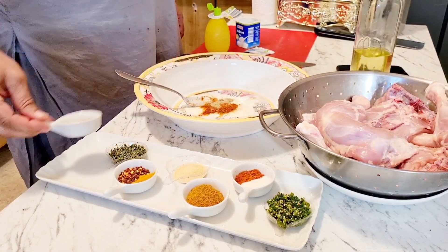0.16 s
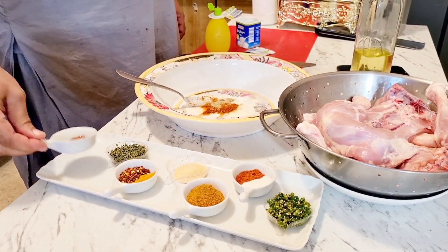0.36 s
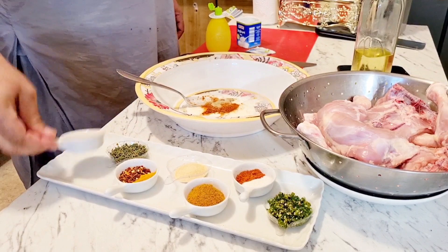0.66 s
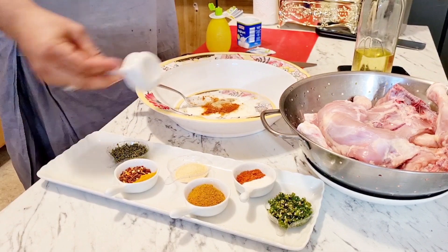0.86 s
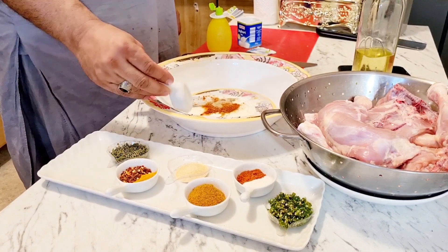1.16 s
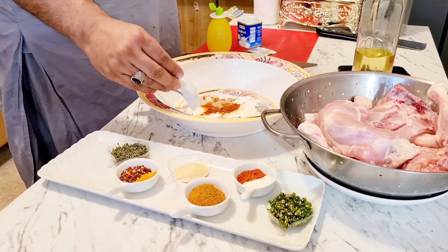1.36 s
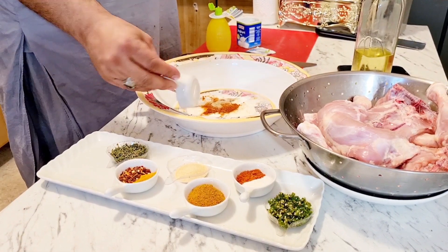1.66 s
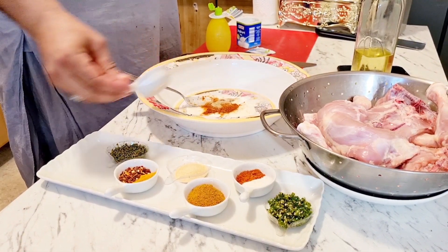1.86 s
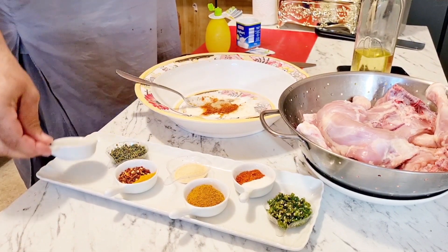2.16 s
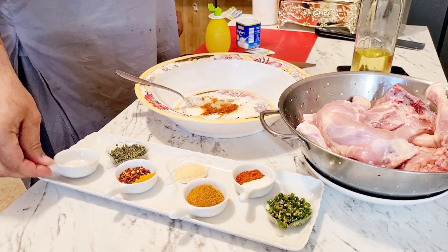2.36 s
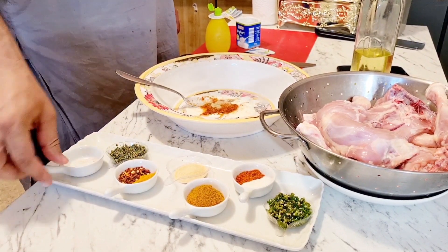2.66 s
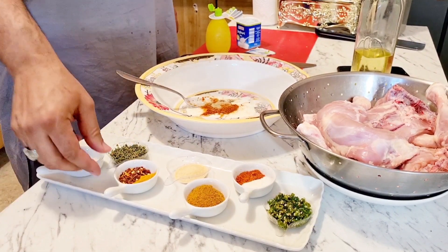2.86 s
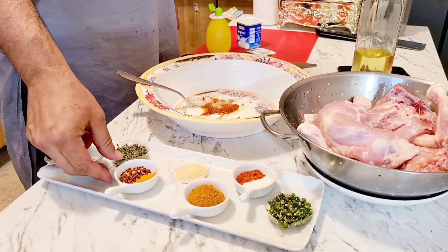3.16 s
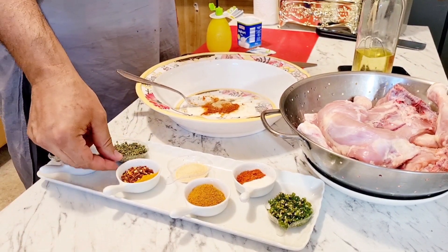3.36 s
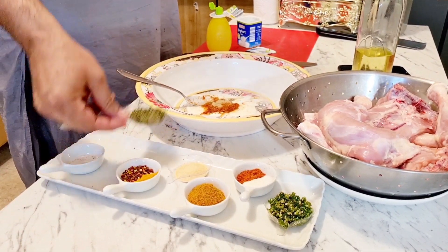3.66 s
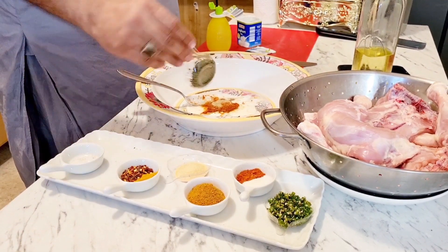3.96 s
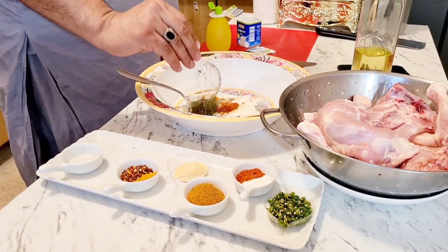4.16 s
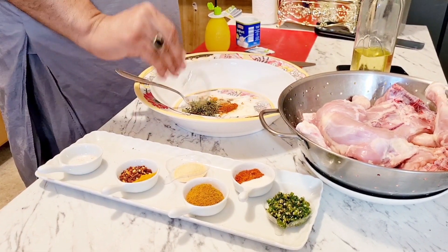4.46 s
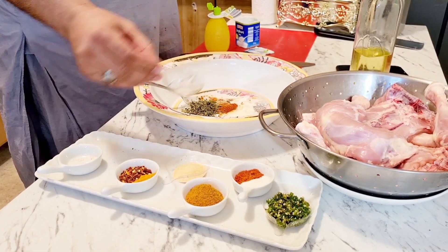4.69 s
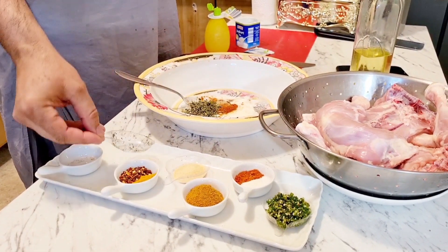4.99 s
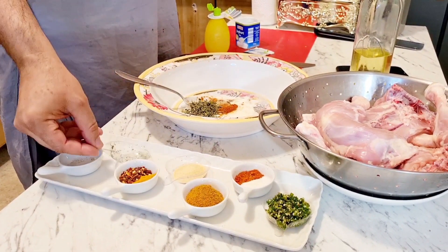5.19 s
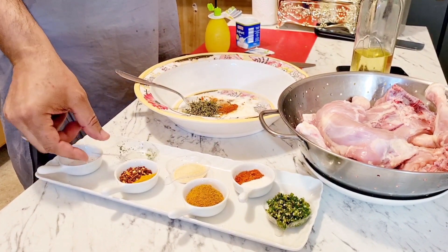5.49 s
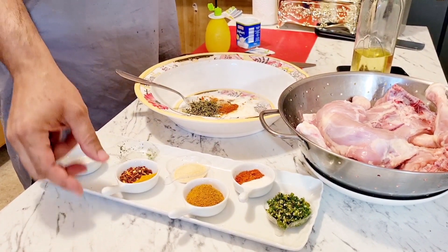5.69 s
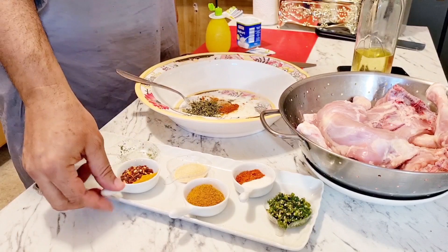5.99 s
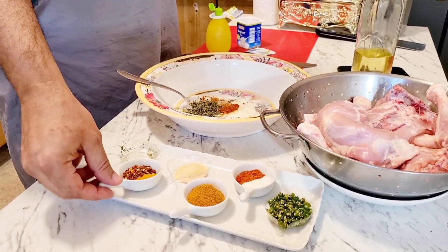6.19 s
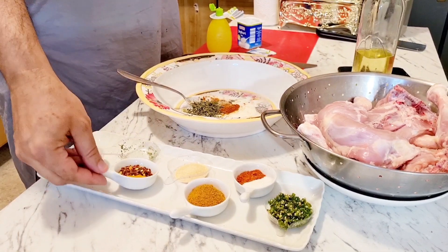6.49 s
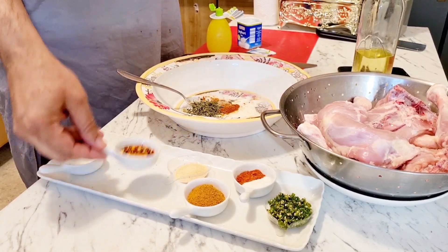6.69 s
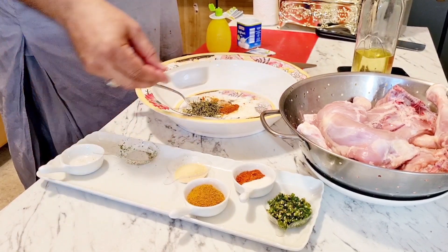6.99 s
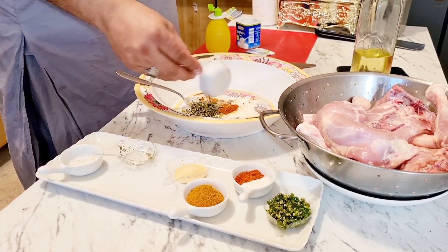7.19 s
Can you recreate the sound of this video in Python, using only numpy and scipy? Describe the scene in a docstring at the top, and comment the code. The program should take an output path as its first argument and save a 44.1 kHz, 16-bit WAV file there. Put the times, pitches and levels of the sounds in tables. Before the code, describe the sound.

In a quiet, hard-walled kitchen, a small ceramic bowl raps very loudly on a large bowl, then more softly. It strikes a neighbour with a loud ringing clink and clatters onto its tray. Dry herbs slide out in a short hiss, a glass bowl knocks back onto counter and tray, another bowl is nudged, and chilli flakes shower down. A clock ticks faintly. Close stereo microphones distort on the hardest blow.

```python
"""Small ceramic and glass bowls knock on a large bowl, on each other and on their tray in a hard-walled kitchen.
Each blow layers a double clack of shaped noise over decaying sine modes; the hardest overload the microphones.
Dry herbs and chilli flakes, tipped out by a cook, hiss as showers of tiny impacts, and a sleeve brushes as soft noise.
A clock ticks faintly once a second in short noise clacks, over coloured-noise air and a low hum."""
import sys
import numpy as np
from scipy import signal
from scipy.fft import rfft, irfft
from scipy.io import wavfile
from scipy.ndimage import uniform_filter1d

SR = 44100
rng = np.random.default_rng(int(sys.argv[2]) if len(sys.argv) > 2 else 0)


def wav_record(signal):
    """Record a signal, one row per channel, as 16-bit PCM in the file named by sys.argv[1]."""
    frames = np.transpose(np.atleast_2d(signal))
    bounded = np.clip(frames, -1, 1)
    # unit amplitude maps onto the largest positive 16-bit level
    quanta = np.round(bounded * 32767).astype(np.int16)
    wavfile.write(sys.argv[1], SR, quanta)


N = 323694  # length [samples]


def amp(db):
    """Decibels to gain."""
    return 10 ** (np.asarray(db) / 20)


def evened(x):
    """Scales to an rms of one."""
    return x / np.sqrt(np.mean(x ** 2) + 1e-20)


def read(points, hz):
    """Reads a spectrum on a log-frequency axis."""
    f, value = np.transpose(points)
    return np.interp(np.log(hz + 1), np.log(f), value)


def add(mix, s, sound):
    """Mixes a sound in at time s, cut off at the end of the mix."""
    part = mix[..., max(round(s * SR), 0):][..., :sound.shape[-1]]
    part += sound[..., :part.shape[-1]]


def coloured(x, spectrum):
    """Gives a full-length signal a spectrum, at an rms of one."""
    gain = amp(read(spectrum, np.fft.rfftfreq(N, 1 / SR)))
    return evened(irfft(rfft(x) * gain, N))


def swells(rows):
    """Gain that rises and falls smoothly about the middle of each row."""
    t = np.arange(N) / SR
    return sum(amp(db) * np.exp(-(2 * (t - s) / length) ** 2) for s, length, db in rows)


def burst(shape, count=4):
    """Noise of energy one under an envelope, with an even spectrum."""
    x = rng.standard_normal(len(shape)) * shape
    for _ in range(count):
        # flatten the spectrum, then restore the envelope
        x = irfft(np.exp(1j * np.angle(rfft(x))), len(shape))
        x *= shape / np.sqrt(abs(uniform_filter1d(x ** 2, size=128)) + 1e-18)
    return x / np.linalg.norm(x)


def contact(hz, bright_hz):
    """A softer contact drives the high modes less: gain falls steeply above bright_hz."""
    return 1 / np.sqrt(1 + (hz / bright_hz) ** 6)


def clack(spectrum, t60, bright_hz, modes=(), lift=1.6, width=0.022, size=8192):
    """Dense, quickly damped modes, made of decaying noise; they crowd round the main modes."""
    shape = amp(-60 * np.arange(size) / SR / t60) + 1e-7
    hz = abs(np.fft.fftfreq(size, 1 / SR))
    crowd = 1 + sum(lift / (1 + ((hz / mode[0] - 1) / width) ** 2) for mode in modes)
    gain = evened(amp(read(spectrum, hz)) * contact(hz, bright_hz) * crowd)
    # minimum phase keeps the attack sharp
    colour = np.exp(np.conj(signal.hilbert(np.log(gain + 1e-5))))
    noise = np.fft.ifft(np.fft.fft(burst(shape)) * colour).real
    fade = np.cos(np.linspace(0, np.pi / 2, size)) ** 2
    return noise * np.linalg.norm(shape) * fade


def ring(modes, bright_hz, free, echo, twin=0.26, split=0.0029, size=16000):
    """Decaying modes of random sign; an uneven wall gives each a weaker twin that beats with it."""
    hz, db, t60 = np.transpose(modes)[:, :, None]
    t60 = t60 * free
    t = np.arange(size) / SR
    sign, side = rng.choice([-1, 1], (2, *hz.shape))
    waves = np.sin(2 * np.pi * hz * t)
    waves += twin * np.sin(2 * np.pi * hz * (1 + side * split) * t)
    # mode levels hold at the microphones: divide by the room's gain across each mode's width
    power = (abs(rfft(echo)) ** 2).mean(0)
    bins = np.fft.rfftfreq(echo.shape[1], 1 / SR)
    weight = 1 / (1 + ((bins - hz) * 2 * np.pi * t60 / np.log(1000)) ** 2)
    room_gain = np.sqrt(weight @ power / weight.sum(1))[:, None]
    decay = amp(db - 60 * t / t60)
    return (sign * contact(hz, bright_hz) * decay * waves / room_gain).sum(0)


# colour of the echo at each microphone: (frequency [Hz], relative level [dB])
ECHO_COLOUR_LEFT = [(60, -3.5), (200, 1.5), (500, -3), (1200, -2.5), (2200, -7), (4000, -12.5),
                    (6500, -6.5), (15000, -2.5)]
ECHO_COLOUR_RIGHT = [(60, -8.5), (200, 0.5), (500, -2.5), (1200, 0.5), (2200, 1), (4000, -1), (6500, 6),
                     (15000, 9.5)]
RIGHT_LAG = 5  # samples by which the right microphone hears the direct sound later


def kitchen(wet_db, t60=0.34, build_s=.045, early=.38, air_hz=13000, left_db=-3, right_db=0,
            mono_hz=330, near=.5, near_s=0.0088, size=28000):
    """Direct path, quick counter reflections and an echo building between hard walls; air soaks up treble first."""
    t = np.arange(size) / SR
    build = 1 - (1 - early) * np.exp(-(t / build_s) ** 2)
    reflections = near * np.exp(-t / near_s)
    shape = amp(-60 * t / t60) * (build + reflections)
    hz, when, z = signal.stft([burst(shape), burst(shape)], SR, nperseg=256)
    same = 1 / (1 + (hz[:, None] / mono_hz) ** 4)  # long waves reach both microphones alike
    z[1] = np.sqrt(same) * z[0] + np.sqrt(1 - same) * z[1]
    colour_db = np.array([read(ECHO_COLOUR_LEFT, hz), read(ECHO_COLOUR_RIGHT, hz)])[:, :, None]
    air_loss_db = 60 * when * (hz[:, None] / air_hz) ** 2
    echo = signal.istft(z * amp(wet_db + colour_db - air_loss_db), SR, nperseg=256)[1]
    echo[0, 0] += amp(left_db)
    echo[1, RIGHT_LAG] += amp(right_db)
    return echo


def heard(x, echo):
    """Carries a sound through the room to both microphones."""
    return signal.fftconvolve(x[None], echo, axes=1)[:, :N]


# air at each microphone, rumble to hiss: (frequency [Hz], relative density [dB per Hz])
AIR_LEFT_SPECTRUM = [(20, -6.5), (45, -1), (100, -16.5), (200, -22.5), (270, -18.5), (500, -23.5),
                     (1000, -30.5), (1180, -14.5), (1500, -34.5), (4700, -31), (6100, -30.5), (6900, -11),
                     (7900, -32.5), (15500, -35.5)]
AIR_RIGHT_SPECTRUM = [(20, 5), (45, 7), (110, -9), (190, -11.5), (270, -18), (650, -25.5), (2500, -29),
                      (2900, -19), (4800, -21), (6900, -14), (8000, -40), (11500, -31), (15500, -32)]
# swells of the faint low hum: (middle [s], length [s], level [dB])
HUM_RISES = [(.1, 0.37, -67.5), (.8, 0.35, -71.5), (1.88, 0.33, -68), (2.8, 0.46, -69.5),
             (5.1, 0.22, -62.5)]


def room_tone(left_db=-67.0, right_db=-62.0, hum_rest_db=-85):
    """Rumble and thin hiss as coloured noise, with a low hum that swells and fades."""
    a, b, c = rng.standard_normal((3, N))
    left = amp(left_db) * coloured(a, AIR_LEFT_SPECTRUM)
    right = amp(right_db) * coloured(.5 * a + b, AIR_RIGHT_SPECTRUM)
    hum_band = ((150, -30), (250, -2), (350, 0), (480, -25), (1000, -60))
    hum = np.maximum(amp(hum_rest_db), swells(HUM_RISES)) * coloured(c, hum_band)
    return np.array([left, right]) + hum


# sleeve brushes as the arm moves: (middle [s], length [s], level before the room [dB])
BRUSHES = [(.12, 0.27, -65.5), (.69, 0.23, -57.5), (5.76, 0.44, -62)]
# hiss of the cloth: (frequency [Hz], relative density [dB per Hz])
CLOTH_HISS = [(500, -12), (2000, -13), (4200, -1.5), (5500, -0.5), (7000, -2.5), (8000, -34), (15500, -14)]


def sleeve(slips_per_s=1500):
    """Cloth fibres slip in a soft hiss that follows the arm."""
    slips = rng.standard_normal(N) * (rng.random(N) < slips_per_s / SR)
    brushing = swells(BRUSHES) * coloured(slips, CLOTH_HISS)
    return heard(brushing, kitchen(wet_db=-2)) * amp([[-10], [-3]])


# tone of the clock case: (frequency [Hz], relative density [dB per Hz])
CASE_TONE = [(200, -31.5), (650, -14.5), (950, -29.5), (1300, -13), (2400, -9), (2850, 5), (3600, -5),
             (4700, -14.5), (5600, -3.5), (6700, -9.5), (8100, -35.5), (10500, -30.5), (15600, -33)]
FIRST_TICK_S, TICK_PERIOD_S = .887, 1
TOCK_LATE_S, TOCK_DB = 0.017, 4  # every other catch comes late, and that tick is louder
TICK_GROWTH_DB_PER_S = 0.94  # the ticks grow slightly louder
# parts of one tick: (base level [dB], t60 [s])
CATCH, STEP, REBOUND = (-49, .16), (-42, 0.02), (-49.5, 0.04)
STEP_S, REBOUND_S = .036, .056  # after the start of the tick


def clock(direct_db=-6):
    """A small escapement across the room: a catch, then the hand's step and rebound, heard mostly as echo."""
    out = np.zeros(N)
    for k, s in enumerate(np.arange(FIRST_TICK_S, N / SR, TICK_PERIOD_S)):
        tock = k % 2
        lift_db = tock * TOCK_DB + TICK_GROWTH_DB_PER_S * s
        for delay, (db, t60) in ((tock * TOCK_LATE_S, CATCH), (STEP_S, STEP), (REBOUND_S, REBOUND)):
            add(out, s + delay, amp(db + lift_db) * clack(CASE_TONE, t60, bright_hz=13910))
    echo = kitchen(wet_db=-0.5, t60=.24, build_s=.02, early=0.29, near=0,
                   left_db=direct_db, right_db=direct_db)
    return heard(out, echo) * amp([[-9], [0]])


# ring of the unloaded tray: (frequency [Hz], relative level [dB], t60 [s])
TRAY_MODES = [(178, -9, .1), (209.5, -1, 0.66), (234, -9, .1), (336, -10, 0.058), (420, -15, 0.034),
              (554, -7.5, 0.19), (634, -6.5, .13), (720, -6, 0.12), (810, -5, 0.054), (868, -6.5, 0.031),
              (1145, -0.5, 0.061), (1330, -6.5, 0.071)]
TRAY_FREE = 0.31  # share of the tray's ring time that its load leaves
RING_GROWTH = 0.7  # dB of ring per dB of strength: a harder blow comes with a firmer, damping grip
BOUNCE_S, BOUNCE_SOFTER = .005, 0.58  # a bowl lands twice; the second contact has this share of the brightness


def blows(rows, modes, spectrum, clack_t60, lift, wet_db, ring_db, free, bounce_db):
    """Each blow clacks, bounces, rings and thumps the tray; free is the share of ring time the grip leaves."""
    out = np.zeros((2, N))
    for s, db, bright_hz, tray_db in rows:
        echo = kitchen(wet_db)
        hit = amp(ring_db + RING_GROWTH * db) * ring(modes, bright_hz, free, echo)
        hit += amp(tray_db) * ring(TRAY_MODES, bright_hz, TRAY_FREE, echo, twin=0)
        first = clack(spectrum, clack_t60, bright_hz, modes, lift)
        second = clack(spectrum, clack_t60, BOUNCE_SOFTER * bright_hz, modes, lift)
        add(hit, 0, amp(db) * first)
        add(hit, BOUNCE_S, amp(db + bounce_db) * second)
        add(out, s, heard(hit, echo))
    return out


# raps on the large bowl: (time [s], strength [dB], contact brightness [Hz], tray thump [dB])
RAP_HITS = [(1.1388, 12, 6363, -14), (1.4125, -7, 11600, -71), (1.4148, -12.5, 1460, -25.5)]
# ring of the large bowl before the grip damps it: (frequency [Hz], relative level [dB], t60 [s])
LARGE_BOWL_MODES = [(687, -5, .16), (1120, -3, .34), (1161, -7, .36), (1194, -5, .3), (1457, -8, .21),
                    (1779, -16, .2), (2051, -2, .22), (2130, -2, .33), (2735, -3, .25), (2853, -7, .23),
                    (2920, -7, .24), (3100, -7, .23), (3252, -2, .22), (3390, -7, .23), (3749, -14, .24),
                    (4915, -19, .22), (5458, -14, .22), (6400, -16, .25), (6815, -17, .25)]
# dense modes of the rim: (frequency [Hz], relative density [dB per Hz])
RIM_TONE = [(30, -25.5), (150, -17.5), (300, -10), (650, -1.5), (920, -5.5), (1200, 2), (1700, -0.5),
            (2350, -0.5), (3000, 0.5), (4100, -1), (5400, -5.5), (7100, -10), (8000, -19), (15500, -24.5)]


def raps():
    """A small bowl is rapped on the large bowl to empty it, and the large bowl rings."""
    return blows(RAP_HITS, LARGE_BOWL_MODES, RIM_TONE, clack_t60=.045, lift=0.95,
                 wet_db=0.5, ring_db=-16.0, free=0.65, bounce_db=-7)


# rim-to-rim strikes: (time [s], strength [dB], contact brightness [Hz], tray thump [dB])
CLINK_HITS = [(2.2518, 7.5, 13660, -11.5)]
# ring of the small bowl, undamped; the settles play it too: (frequency [Hz], relative level [dB], t60 [s])
SMALL_BOWL_MODES = [(2631, -15, .14), (2826, -7, .18), (3421, -3.5, .3), (3569, -9, .26), (3707, -13, .2),
                    (4341, -3, .26), (4383, -7, .22), (4865, -6, .28), (4915, -9, .3), (5499, -19, .32),
                    (6318, -5, .27), (6894, -8, .32), (7381, -15, .28), (8271, -20, .33), (8450, -24, .32),
                    (9668, -22, .32), (9767, -21, .25), (10480, -27, .32), (11150, -22, .32),
                    (11570, -22, .32), (12890, -24, .3)]
# dense modes of bowl on tray, in the settles too: (frequency [Hz], relative density [dB per Hz])
TRAY_TONE = [(30, -22.5), (150, -24.5), (300, -18.5), (700, -16.5), (1300, -1.5), (2000, -3), (2600, 9.5),
             (3600, 15.5), (5000, 2), (7000, 3.5), (8000, -21.5), (15500, -17)]


def clinks():
    """The emptied bowl strikes a neighbour rim to rim and rings loudly, its ring time about halved."""
    return blows(CLINK_HITS, SMALL_BOWL_MODES, TRAY_TONE, clack_t60=.05, lift=1.0,
                 wet_db=2.5, ring_db=-4, free=0.54, bounce_db=-10)


# small bowls moved on the tray: (time [s], strength [dB], contact brightness [Hz], tray thump [dB])
SETTLE_HITS = [(2.436, -5.5, 3100, -19.5), (2.507, -6.5, 3270, -27), (2.987, -25, 2980, -35.5),
               (3.255, -50, 1520, -46.5), (5.279, -29, 2900, -31.5), (6.002, -47, 1020, -31.5),
               (6.255, -44, 2200, -46), (6.32, -48, 3700, -54.5), (6.473, -38, 4230, -58.5)]


def settles():
    """Small bowls are set down, nudged and lifted on the tray, with a quiet ring."""
    return blows(SETTLE_HITS, SMALL_BOWL_MODES, TRAY_TONE, clack_t60=0.024, lift=0.73,
                 wet_db=1, ring_db=-15.5, free=0.59, bounce_db=-7.5)


# bumps on the chilli bowl: (time [s], strength [dB], contact brightness [Hz], tray thump [dB])
BUMP_HITS = [(3.245, -42, 8800, -58.5), (6.028, -19.5, 9340, -40.5), (6.098, -40, 5000, -52),
             (6.19, -42, 7600, -69), (6.355, -56, 7800, -53.5)]
# ring of the chilli bowl, undamped: (frequency [Hz], relative level [dB], t60 [s])
CHILLI_BOWL_MODES = [(2800, -21, 0.14), (3450, -3, 0.16), (4220, -6, 0.31), (4860, 8.5, 0.052),
                     (5690, -3, 0.079), (6245, 4.5, 0.091), (7070, -11, 0.47), (7350, -13, 0.51),
                     (8400, -10, 0.11), (9400, -14.5, 0.6), (10200, -4, 0.19), (11130, -5, 0.28),
                     (11800, -13, 0.47), (12855, -17, 0.094), (13900, -24, 0.2)]
# dense modes of the bumps: (frequency [Hz], relative density [dB per Hz])
BUMP_TONE = [(30, -33), (150, -20), (550, -4), (800, -5), (1200, 0), (2000, -2.5), (3300, 5), (4100, -6),
             (6500, -9.5), (8000, -25), (11500, -21), (15500, -7)]


def bumps():
    """The chilli bowl is bumped by its neighbours as the hand reaches in, and rings briefly."""
    return blows(BUMP_HITS, CHILLI_BOWL_MODES, BUMP_TONE, clack_t60=0.022, lift=0.99,
                 wet_db=2, ring_db=-15.5, free=0.53, bounce_db=-11.5)


POUR_ATTACK_S, POUR_RELEASE_DB_PER_S = 0.022, 330
TRICKLE_DB, TRICKLE_RISE_DB_PER_S = -15.5, 70  # a few grains run ahead of the heap


def flow_of(s, length, db):
    """A trickle builds, the heap slides all at once, and the flow dies away."""
    t = np.arange(N) / SR - s
    trickle = amp(TRICKLE_DB + TRICKLE_RISE_DB_PER_S * np.minimum(t, 0))
    heap = np.clip(1 + t / POUR_ATTACK_S, 0, 1)
    return np.maximum(trickle, heap) * amp(db - POUR_RELEASE_DB_PER_S * np.maximum(t - length, 0))


# dry spice sliding or falling: (time [s], length [s], base level [dB])
SPICE_POURS = [(3.361, .07, -56), (4.034, 0.1, -45), (4.526, 0.035, -61.5), (7.242, 0.078, -38)]
# hiss of the grains: (frequency [Hz], relative density [dB per Hz])
GRAIN_HISS = [(500, -23), (2000, -19.5), (2900, 0), (4200, 2), (6500, 4.5), (7400, -5.5), (8200, -15.5),
              (12000, -5.5), (15500, -10)]
# single large flakes landing: (time [s], base level [dB])
FLAKE_HITS = [(3.353, -42), (3.423, -41), (4.003, -42), (4.072, -35), (4.543, -38)]


def spices(grains_per_s=5000, spread_db=2.5, flow_db=-3):
    """Thousands of tiny impacts of uneven size, and a few large flakes."""
    flow = amp(flow_db) * sum(flow_of(*pour) for pour in SPICE_POURS)
    sizes = amp(spread_db * np.minimum(rng.exponential(1, N), 5)) * rng.choice([-1, 1], N)
    grains = sizes * (rng.random(N) < grains_per_s / SR)
    out = flow * coloured(grains, GRAIN_HISS)
    for s, db in FLAKE_HITS:
        add(out, s, amp(db) * clack(GRAIN_HISS, t60=.01, bright_hz=8000))
    return heard(out, kitchen(wet_db=-6.0)) * amp([[-5], [2]])


# touchdowns on the counter: (time [s], strength [dB], contact brightness [Hz], tray thump [dB])
TOUCH_HITS = [(5.151, -23, 10000, -42)]
# ring of the stone counter: (frequency [Hz], relative level [dB], t60 [s])
COUNTER_MODES = [(1044, 0, .08), (1130, -11, .07), (1480, -15, .12), (2783, -17, .15), (3171, -17, .15)]
# dense modes of the glass, in the glass knocks too: (frequency [Hz], relative density [dB per Hz])
GLASS_TONE = [(30, -10), (150, -20), (350, -5.5), (900, 4), (2100, 0.5), (3300, 6.5), (4800, 6.5),
              (6800, 5), (8000, -7.5), (11500, -2.5), (15500, -1)]


def touches():
    """The glass bowl touches down on the stone counter, whose modes ring undamped."""
    return blows(TOUCH_HITS, COUNTER_MODES, GLASS_TONE, clack_t60=0.016, lift=0.92,
                 wet_db=4.0, ring_db=-5, free=1.0, bounce_db=-4.5)


# glass on the tray: (time [s], strength [dB], contact brightness [Hz], tray thump [dB])
GLASS_HITS = [(5.350, -15, 8250, -32.5), (5.388, -22.5, 7000, -29), (5.403, -17.5, 3600, -26.5)]
# ring of the glass bowl, undamped: (frequency [Hz], relative level [dB], t60 [s])
GLASS_BOWL_MODES = [(1620, -6.5, 0.31), (2440, -30, 0.6), (2810, -3, 0.9), (3360, 8.5, 0.089),
                    (3450, 5, 0.049), (4070, 10.5, 0.084), (4350, -15, 0.05), (4900, -28, 0.6),
                    (7150, -29, 0.87), (9000, -33.5, 0.27), (9700, -27, 0.34), (11900, -5, 0.3)]


def glass_knocks():
    """The glass herb bowl is put back on the tray, its ring strongly damped."""
    return blows(GLASS_HITS, GLASS_BOWL_MODES, GLASS_TONE, clack_t60=0.0114, lift=0.65,
                 wet_db=6.5, ring_db=-16.5, free=0.22, bounce_db=-15)


def scene():
    """All the crockery, the pouring, the sleeve, the clock and the room."""
    crockery = raps() + clinks() + settles() + bumps() + touches() + glass_knocks()
    return crockery + spices() + sleeve() + clock() + room_tone()


EDGE_HZ = 15800  # top of the band


def record(dry):
    """Anything beyond full scale clips; then a steep low-pass limits the band."""
    clipped = np.clip(dry, -1, 1)
    band_limit = signal.firwin(511, EDGE_HZ, window=("kaiser", 8), fs=SR)
    return signal.oaconvolve(clipped, band_limit[None], "same")


dry = scene()
out = record(dry)
wav_record(out)
```